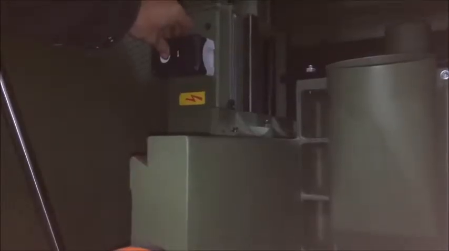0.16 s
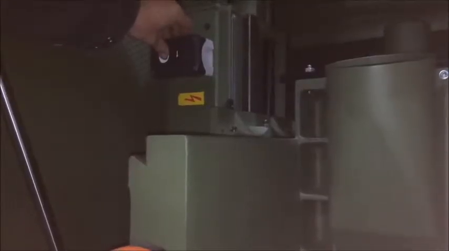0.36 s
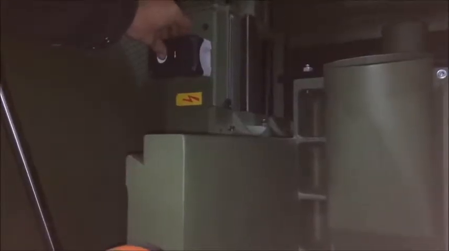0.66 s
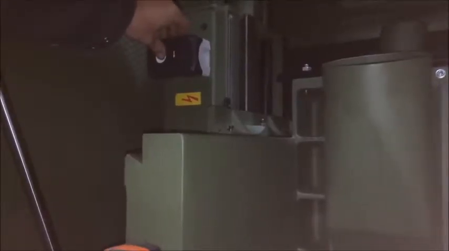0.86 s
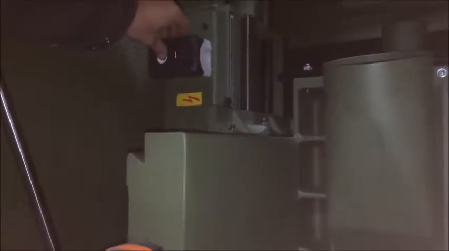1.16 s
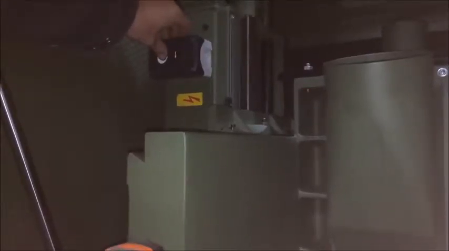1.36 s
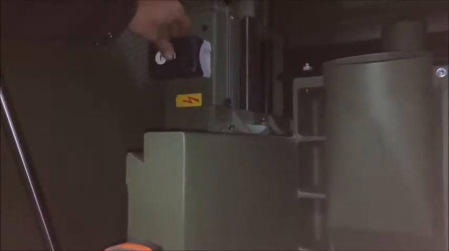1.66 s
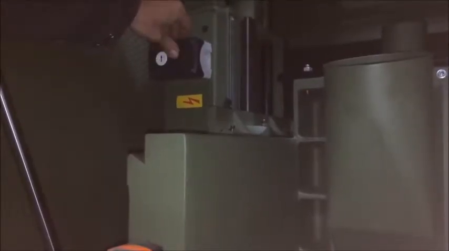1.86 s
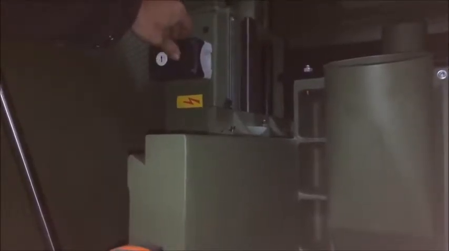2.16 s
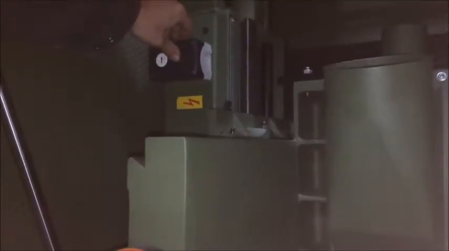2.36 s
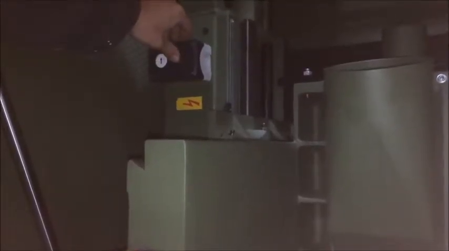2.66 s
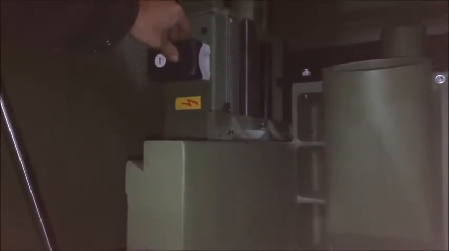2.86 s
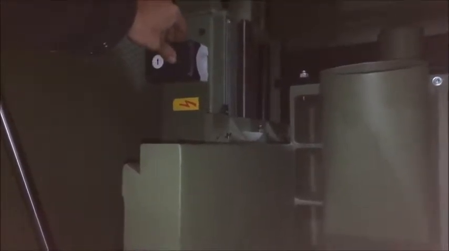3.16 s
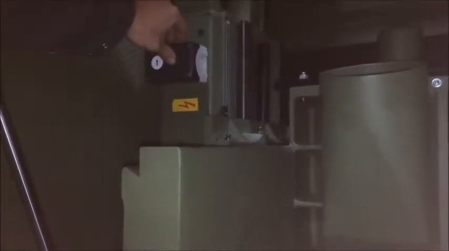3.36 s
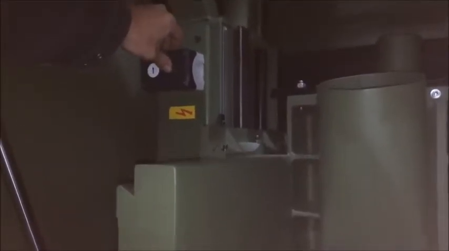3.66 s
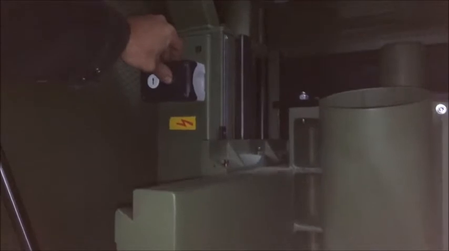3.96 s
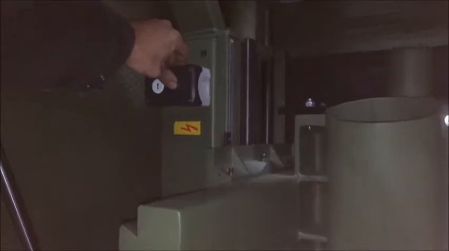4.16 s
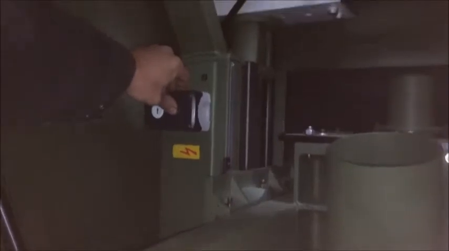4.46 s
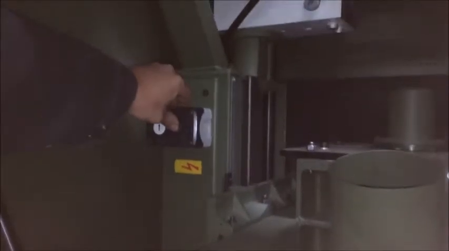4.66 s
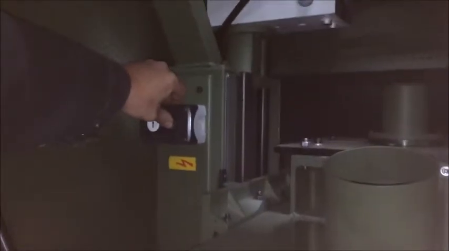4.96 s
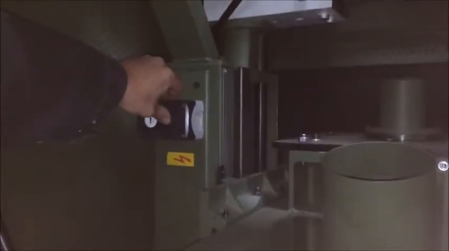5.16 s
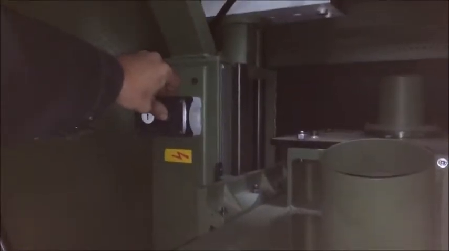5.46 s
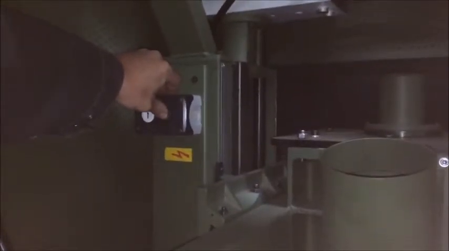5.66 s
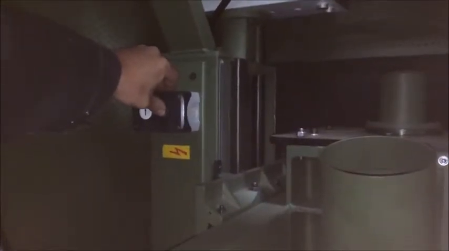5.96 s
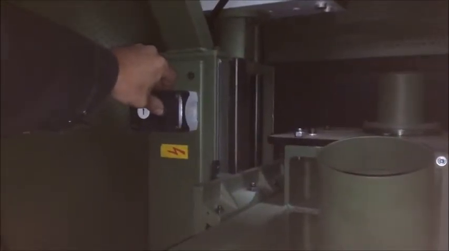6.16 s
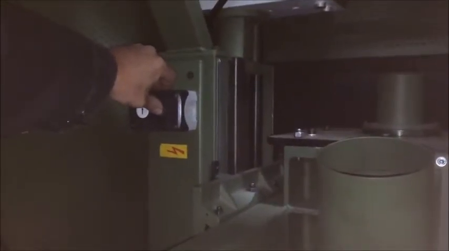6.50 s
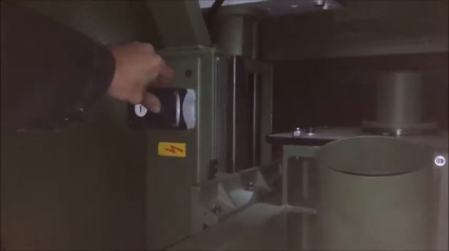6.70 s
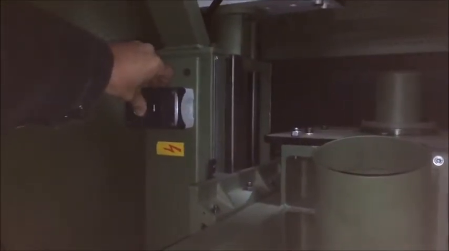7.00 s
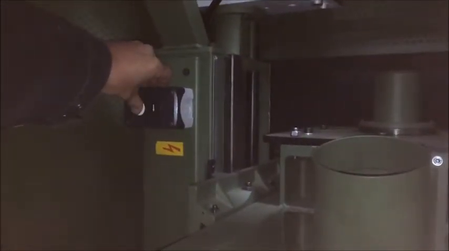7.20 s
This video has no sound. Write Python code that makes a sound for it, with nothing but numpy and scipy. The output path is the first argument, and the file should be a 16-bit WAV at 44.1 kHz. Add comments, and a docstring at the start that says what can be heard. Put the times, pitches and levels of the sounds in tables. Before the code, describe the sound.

Gritty electric lift motor whirring with a fast cyclic squeal in a workshop, broken by a hard switch clack, short pause, reversed run and final snap.

```python
"""A small electric lift motor drives a machine unit one way, stops, and is switched to run the other way, in a workshop.
Its gearing growls: noise that repeats every shaft turn, mixed with fresh hiss, under steady wavering mesh tones.
Once a turn a squeal of short gliding tones climbs through the pitches of the casing while another falls.
The switch snaps loudly at each stop and start, in bursts of coloured noise, and rings the resonators of a steel frame."""
import sys
import numpy as np
from scipy import signal
from scipy.fft import rfft, irfft, next_fast_len
from scipy.io import wavfile
from scipy.ndimage import map_coordinates

SR = 44100
rng = np.random.default_rng(int(sys.argv[2]) if len(sys.argv) > 2 else 0)


def wav_record(signal):
    """Record a signal, one row per channel, as 16-bit PCM in the file named by sys.argv[1]."""
    frames = np.transpose(np.atleast_2d(signal))
    bounded = np.clip(frames, -1, 1)
    # unit amplitude maps onto the largest positive 16-bit level
    quanta = np.round(bounded * 32767).astype(np.int16)
    wavfile.write(sys.argv[1], SR, quanta)


N = 323382
TIME = np.arange(N) / SR

FIRST_STOP_S, RESTART_S, LAST_STOP_S = 1.6568, 2.0168, 6.9902
FIRST_TURNS_PER_S, SECOND_TURNS_PER_S = 11.6, 11.9


def from_db(db):
    """Turns decibels into an amplitude factor."""
    return 10 ** (np.asarray(db) / 20)


def rms_one(x):
    """Scales a signal to an rms of 1."""
    return x / np.sqrt(np.mean(x ** 2) + 1e-20)


def ramp(start_s, length_s):
    """Rises in a straight line from 0 to 1."""
    return np.clip((TIME - start_s) / length_s, 0, 1)


def drift(per_s, size=N):
    """Random motion of rms 1, gliding between per_s random values each second."""
    knots = rng.standard_normal(size // 8)
    position = np.arange(size) * per_s / SR
    return rms_one(np.interp(position, np.arange(len(knots)), knots))


def coloured(x, spectrum, resonances=()):
    """Gives a noise a broad spectrum with narrow peaks and hollows on it; rms 1."""
    size = next_fast_len(len(x), True)
    hz = np.maximum(np.arange(size // 2 + 1) * SR / size, 1)
    points = np.array(spectrum)
    db = np.interp(np.log(hz), np.log(points[:, 0]), points[:, 1])
    for centre_hz, width_hz, peak_db in resonances:
        db = db + peak_db / (1 + (2 * (hz - centre_hz) / width_hz) ** 2)
    shaped = irfft(rfft(x, size) * from_db(db), size)
    return rms_one(shaped[:len(x)])


def first_run():
    """The motor is already turning and dies quickly when it is cut."""
    # Growl of the gears. Each row: frequency in Hz, relative density in dB.
    growl_spectrum = [(120, -48), (200, -23), (298, -4), (392, -15), (471, -6), (618, -20), (858, -3.5),
                      (1030, -10.5), (1090, -13.5), (1400, -1.5), (1880, -10), (2290, -25.5), (3070, -20.5),
                      (3960, -38), (15500, -51.5)]
    # Tones of the meshing teeth. Each row: frequency in Hz, rms in dB before the gain of the run.
    mesh_tones = [(91.5, -54.5), (301.5, -57), (463.0, -62.5), (559.9, -56.5), (721.4, -66.5),
                  (839.8, -62.5), (1114, -50), (1396, -45.5)]
    turns = FIRST_TURNS_PER_S * TIME + 0.0023 * drift(5.7)
    power = 1 - ramp(FIRST_STOP_S, .045)
    notes = rubs(start=.14, dwell=.2, foot_hz=1381, foot_db=-46, climb_hz_per_turn=375, crest_hz=np.inf,
                 climb_db=1.5, swell_db_per_turn=-2.5, fall_start=.12, fall_db=-1,
                 tight_place=0.12, squeak_hz=3030, squeak_db=-56)
    gears = from_db(-45) * growl(turns, growl_spectrum, fresh_above_hz=1770, scrape_place=0.16,
                                 scrape_length=0.087, scrape_db=0.5, hiss_db=7.0, grain_db=2.0)
    whine = squeals(turns, FIRST_TURNS_PER_S, notes, power > 0, rough=0.56, uneven_db=2.5, slip=0.05)
    return power * (gears + whine + from_db(-4.5) * hum(mesh_tones, waver=.5))


def second_run():
    """The other direction is a little faster; as the unit travels the climb slows and bends over at a crest."""
    # Growl early and late in the travel. Each row: frequency in Hz, relative density in dB.
    early_spectrum = [(120, -60.5), (200, -33.5), (293, -5), (462, -8.5), (506, -10.5), (702, -1.5),
                      (1150, -7.5), (1260, -10), (1400, 0), (1880, -6.5), (2090, -22.5), (2900, -19.5),
                      (4030, -32), (5800, -33.5), (15500, -55)]
    late_spectrum = [(120, -76), (200, -18.5), (437, -10), (471, -8.5), (515, -16.5), (575, -5),
                     (1260, -7.5), (1400, -3.5), (1510, -2), (1650, 0.5), (2170, -23), (2960, -20),
                     (4100, -35), (5910, -36), (15500, -56.5)]
    # Tones of the meshing teeth. Each row: frequency in Hz, rms in dB before the gain of the run.
    mesh_tones = [(70.0, -62), (358, -58.5), (473.7, -57), (570.6, -57.5), (726.7, -63), (855.9, -65.5),
                  (952.8, -57)]
    turns = SECOND_TURNS_PER_S * TIME + .002 * drift(5)
    power = ramp(RESTART_S, 0.065) * (1 - ramp(LAST_STOP_S, 0.036))
    travel = ramp(3.7, 1.0)  # the colour crossfades over this stretch
    early = power * np.sqrt(1 - travel)
    late = power * np.sqrt(travel)

    early_notes = rubs(start=.26, dwell=.26, foot_hz=1409, foot_db=-44.5, climb_hz_per_turn=505.6,
                       crest_hz=np.inf, climb_db=-0.5, swell_db_per_turn=-0.6, fall_start=.16, fall_db=1.5,
                       tight_place=.92, squeak_hz=2860, squeak_db=-55.5)
    before = from_db(-43.0) * growl(turns, early_spectrum, fresh_above_hz=1300, scrape_place=.88,
                                    scrape_length=0.086, scrape_db=2.1, hiss_db=0.3, grain_db=1.5)
    before += from_db(0.5) * squeals(turns, SECOND_TURNS_PER_S, early_notes, early > 0,
                                     rough=.85, uneven_db=3.0, slip=.05)

    late_notes = rubs(start=.21, dwell=0.14, foot_hz=1420.5, foot_db=-42, climb_hz_per_turn=385,
                      crest_hz=1695, climb_db=-2, swell_db_per_turn=4, fall_start=0.0402, fall_db=-1.0,
                      tight_place=.89, squeak_hz=2887, squeak_db=-54.0)
    after = from_db(-42.0) * growl(turns, late_spectrum, fresh_above_hz=1420, scrape_place=0.97,
                                   scrape_length=0.11, scrape_db=0.5, hiss_db=2.0, grain_db=2.0)
    after += from_db(-0.5) * squeals(turns, SECOND_TURNS_PER_S, late_notes, late > 0,
                                     rough=0.73, uneven_db=2.03, slip=0.031)

    mesh = from_db(-6 + 3.7 * travel) * hum(mesh_tones, waver=0.87)
    return early * before + late * after + power * mesh


def from_place(turns, place):
    """Shaft angle from the nearest passing of a place, in turns."""
    return (turns - place + .5) % 1 - .5


def growl(turns, spectrum, fresh_above_hz, scrape_place, scrape_length, scrape_db, hiss_db, grain_db):
    """The same rough teeth meet on every turn; friction adds fresh hiss; a tight spot is louder and brighter."""
    # Gear casing. Each row: centre in Hz, width in Hz, peak (+) or hollow (-) in dB.
    casing = [(255, 80, 1), (472, 33, 6.5), (610, 27, -2.5), (880, 90, 2), (1135, 53, 6), (1275, 38, -5),
              (1480, 110, -10.5), (1800, 200, -0.5), (2250, 400, 3), (2590, 60, 8), (2905, 250, 6.5),
              (3420, 90, 2), (3716, 70, 12), (4300, 830, -4.5), (4950, 130, 11.5), (5890, 400, 11.5),
              (10750, 200, 3.5)]
    surface = rng.standard_normal(SR // 12)
    position = turns % 1 * len(surface)
    repeating = rms_one(map_coordinates(surface, [position], order=3, mode="grid-wrap"))
    tight = np.exp(-.5 * (from_place(turns, scrape_place) / scrape_length) ** 2)
    teeth = signal.lfilter(*signal.butter(1, fresh_above_hz, "low", fs=SR), repeating)
    hiss = signal.lfilter(*signal.butter(1, fresh_above_hz, "high", fs=SR), rng.standard_normal(N))
    hiss = hiss * from_db(hiss_db * tight)
    loudness = from_db(scrape_db * tight + grain_db * drift(400))
    return coloured((teeth + hiss) * loudness, spectrum, casing)


def squeals(turns, turns_per_s, notes, running, rough, uneven_db, slip):
    """Each rubbing spot sings a short gliding note as it comes round, never quite the same twice."""
    out = np.zeros(N)
    count = int(running.sum())
    for place, length, hz, glide, level_db in notes:
        angle = from_place(turns[running], place)
        phase = 2 * np.pi * (hz + .5 * glide * angle) * angle / turns_per_s
        shake = rough * np.sqrt(hz / 1400) * drift(50, count)  # the grip wavers, high notes most
        # it bites a little early or late
        touch = np.exp(-.5 * ((angle + slip * drift(12, count)) / length) ** 2)
        touch *= np.sqrt(np.abs(np.cos(np.pi * angle)))  # silent on the far side of the turn
        level = from_db(level_db + uneven_db * drift(9.8, count))
        out[running] += np.sqrt(2) * np.sin(phase + shake) * touch * level
    return out


def rubs(start, dwell, foot_hz, foot_db, climb_hz_per_turn, crest_hz, climb_db, swell_db_per_turn,
         fall_start, fall_db, tight_place, squeak_hz, squeak_db):
    """A squeal dwells on its foot and climbs, another falls, and the tight spot squeaks, on every turn.

    Each note: place in turns, length in turns, pitch in Hz, glide in Hz per turn, level in dB."""
    # Casing pitches climbed through. Each row: pitch in Hz, length in turns, level in dB before climb_db and swell.
    climb = [(1595, .14, -44.5), (1717, .09, -44), (1834, .14, -47)]
    # Pitches of the falling squeal. Each row: pitch in Hz, length in turns, level in dB before fall_db.
    fall = [(1130, .16, -55), (862, 0.11, -47), (717, 0.099, -53.5), (478.5, 0.082, -54)]
    fall_hz_per_turn = 996.9
    glide_share = 0.43  # share of the climb that is heard within one note
    sag_share = 0.36  # past its crest the squeal sinks at this share of its climb
    squeak_turns, squeak_hz_per_turn = .11, 320

    notes = [(start, dwell, foot_hz, 0, foot_db)]
    for hz, length, level_db in climb:
        delay = (hz - foot_hz) / climb_hz_per_turn
        if hz < crest_hz:
            pitch, slope = hz, glide_share
        else:
            pitch, slope = crest_hz - sag_share * (hz - crest_hz), -sag_share
        level_db = level_db + climb_db + swell_db_per_turn * delay
        notes.append((start + delay, length, pitch, slope * climb_hz_per_turn, level_db))
    for hz, length, level_db in fall:
        delay = (fall[0][0] - hz) / fall_hz_per_turn
        notes.append((fall_start + delay, length, hz, 0, level_db + fall_db))
    # the high squeak rises, then jumps up 90 Hz and sinks away, 4 dB weaker
    notes.append((tight_place, squeak_turns, squeak_hz, squeak_hz_per_turn, squeak_db))
    notes.append((tight_place + 2 * squeak_turns, squeak_turns, squeak_hz + 90, -squeak_hz_per_turn,
                  squeak_db - 4))
    return notes


def hum(tones, waver):
    """Mesh tones swell and waver as the load shifts."""
    out = np.zeros(N)
    for hz, level_db in tones:
        swell = from_db(level_db + 2.5 * drift(4))
        out += np.sqrt(2) * swell * np.sin(2 * np.pi * hz * TIME + waver * drift(6))
    return out


def switch():
    """Contacts crack, the housing knocks, the armature pings, the panel booms, and the motor jolts with a thud."""
    # Spectra of contact crack, housing knock, armature ping, panel boom and low thud.
    # Each row: frequency in Hz, relative density in dB.
    crack_spectrum = [(1500, -42.5), (3200, -11), (4000, -11), (5000, -3), (5800, -3), (7000, -1),
                      (7700, 1.5), (9000, -2.5), (10000, -6), (13000, -9), (16000, -23.5)]
    knock_spectrum = [(600, -20.5), (1300, -18.5), (1600, 2), (1800, -0.5), (2000, -2), (2300, -18),
                      (5000, -34)]
    ping_spectrum = [(2000, -33), (2500, -10.5), (2950, 3), (3300, -7.5), (4500, -27.5)]
    boom_spectrum = [(120, -23), (260, -16), (330, -4), (420, -4), (490, 0), (560, -14), (690, 6.5),
                     (780, -3.5), (880, 2.5), (1100, -0.5), (1500, -14), (2500, -16), (5000, -26.5)]
    thud_spectrum = [(30, -27.5), (70, -10), (125, 3), (170, -0.5), (240, -17.5), (500, -46)]
    times, crack_db, knock_db, boom_db = np.transpose(snaps())
    crack = chatter(times, crack_db, crack_spectrum, rise_s=0.00033, t60=0.036)
    knock = chatter(times, knock_db, knock_spectrum, rise_s=0.00046, t60=0.037)
    ping = chatter(times, knock_db - 5.5, ping_spectrum, rise_s=.0006, t60=0.05)
    boom = chatter(times, boom_db, boom_spectrum, rise_s=0.0032, t60=.15)
    jolt_times = (FIRST_STOP_S, RESTART_S, LAST_STOP_S)
    thud = chatter(jolt_times, (-37.5, -26, -37.5), thud_spectrum, rise_s=.004, t60=.45)
    heard = workshop(crack + knock + ping + boom, near_db=-12, near_t60=0.088, far_db=-32.5, far_t60=.55)
    # a second crack, opposite in the two channels, gives width
    side = from_db(-27.5) * chatter(times, crack_db, crack_spectrum, rise_s=.0005, t60=.032)
    return heard + thud + frame() + side * np.array([[1], [-1]])


def snaps():
    """The switch drops out and rebounds at each stop, and bounces home at the restart.

    Each impact: time in seconds, then crack, knock and boom in dB."""
    # Blows as the switch drops out. Each row: delay in seconds, contact crack in dB, housing knock in dB.
    drop_out = [(0, -18.5, -10), (.002, -9, -12)]
    drop_boom_db, touch_boom_db, pull_boom_db = -24, -36.5, -21.5
    light_crack_db, light_knock_db = -27, -26
    bounces, bounce_s = 3, .0106

    impacts = []
    for stop_s, rebound_db in ((FIRST_STOP_S, -12), (LAST_STOP_S, -23)):
        for delay, crack_db, knock_db in drop_out:
            impacts.append((stop_s + delay, crack_db, knock_db, drop_boom_db))
        impacts.append((stop_s + .0056, light_crack_db, rebound_db, drop_boom_db))
    # a light touch comes 5 ms before the bounces, and another as it seats
    impacts.append((RESTART_S - .005, light_crack_db, light_knock_db, touch_boom_db))
    for k in range(bounces):
        # each blow cracks harder and knocks less
        impacts.append((RESTART_S + k * bounce_s, -17.5 + 5.5 * k, -14 - 3 * k, pull_boom_db))
    impacts.append((RESTART_S + bounces * bounce_s, light_crack_db, light_knock_db, pull_boom_db))
    return impacts


def chatter(times, levels_db, spectrum, rise_s, t60):
    """Each impact starts a dense rattle that swells for an instant and dies."""
    out, age = np.zeros(N), TIME[:SR]
    shape = (1 - np.exp(-(age / rise_s) ** 2)) * from_db(-60 * age / t60)
    shape_rms = np.sqrt(np.mean(shape ** 2))
    for impact_s, level_db in zip(times, levels_db):
        start = round(impact_s * SR)
        rattle = shape_rms * rms_one(shape * coloured(rng.standard_normal(SR), spectrum))
        out[start:start + SR] += from_db(level_db) * rattle[:N - start]
    return out


def frame():
    """Each switching rings the decaying modes of the steel frame, differently with load and position of the unit."""
    # Modes. Each row: frequency in Hz, t60 in seconds, level in dB at first stop, at restart and at last stop.
    modes = [(119.5, 1, -51, -37, -49), (159.6, 0.99, -43.5, -40.5, -51), (317, .6, -37.5, -55.5, -55.5),
             (354, 0.64, -48.5, -52, -40), (389.5, 0.41, -44, -53.5, -52), (650, 0.92, -47, -55, -48),
             (730, .45, -42, -46, -52), (855, 0.37, -47.5, -32, -46.5), (1367, 0.34, -39, -53, -40),
             (1421, 0.57, -38.5, -42.5, -50), (1670, .33, -55, -45, -46.5), (1900, .4, -54.5, -56.5, -59),
             (2056, .65, -51, -59.5, -48), (2220, 0.44, -63, -60, -45), (2770, .3, -53, -33, -41.5),
             (4960, .42, -66, -45, -66)]
    # Times of the blows that ring the frame, in seconds.
    blow_times = (1.663, 2.038, 6.993)
    out = np.zeros(N)
    at = [round(s * SR) for s in blow_times]
    for hz, t60, *levels_db in modes:
        clicks = np.zeros(N)
        clicks[at] = from_db(levels_db)
        decay = from_db(-60 / (t60 * SR))
        step = 2 * np.pi * hz / SR
        feedback = [1, -2 * decay * np.cos(step), decay * decay]
        out += signal.lfilter([0, np.sin(step)], feedback, clicks + 1e-18)  # inaudible offset
    return out


def workshop(x, near_db, near_t60, far_db, far_t60):
    """Quick reflections off the machine and a faint tail from the room, each a decaying noise echo."""
    # Colour of the echo. Each row: frequency in Hz, relative density in dB.
    echo_spectrum = [(60, -6), (150, -4.5), (500, -0.5), (1000, -10), (2200, -9), (4000, -8.5), (8000, -11),
                     (11000, -15.5), (15000, -27)]
    age, out = TIME[:SR], x
    for level_db, t60 in ((near_db, near_t60), (far_db, far_t60)):
        fade = from_db(-60 * age / t60) * np.clip(age / 0.0043, 0, 1)
        echo = coloured(rng.standard_normal(SR), echo_spectrum) * fade
        out = out + from_db(level_db) * signal.fftconvolve(x, echo / np.linalg.norm(echo))[:N]
    return out


def background():
    """The low rumble of the workshop is steady coloured noise."""
    # Rumble. Each row: frequency in Hz, relative density in dB.
    rumble_spectrum = [(20, -18.5), (35, -17.5), (52, 4.5), (110, -2.5), (170, -12.5), (250, -12.5),
                       (500, -15.5), (1000, -17.5), (2000, -19), (4000, -30.5), (8000, -36.5), (15000, -39)]
    return from_db(-53.5) * coloured(rng.standard_normal(N), rumble_spectrum)


def scene():
    """Two runs of the motor and the switch, over the low rumble of the workshop."""
    return first_run() + second_run() + switch() + background()


def record(dry):
    """The loudest peaks are rounded and the top is cut steeply above 15450 Hz."""
    rounded = 1.12 * np.tanh(dry / 1.105)
    low_pass = signal.ellip(10, .1, 80, 15450, fs=SR, output="sos")
    return signal.sosfilt(low_pass, rounded)


dry = scene()
out = record(dry)
wav_record(out)
```